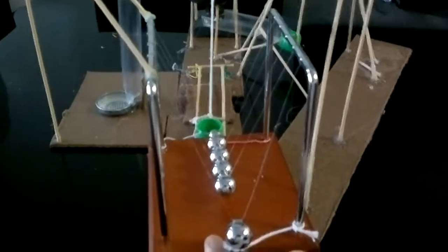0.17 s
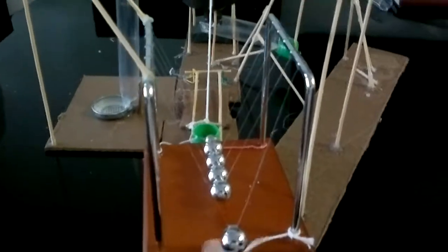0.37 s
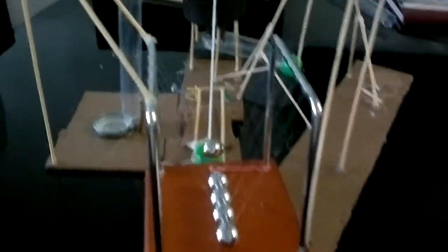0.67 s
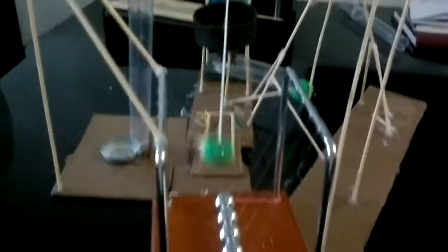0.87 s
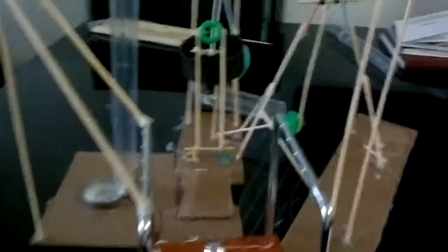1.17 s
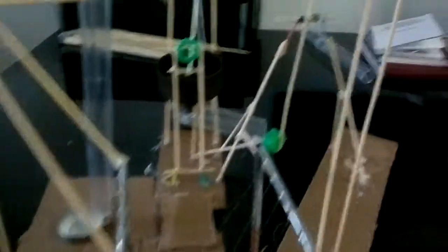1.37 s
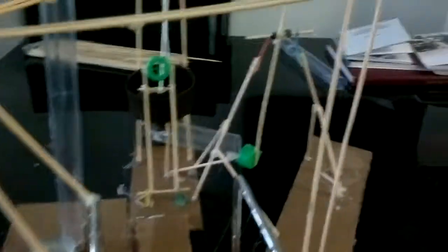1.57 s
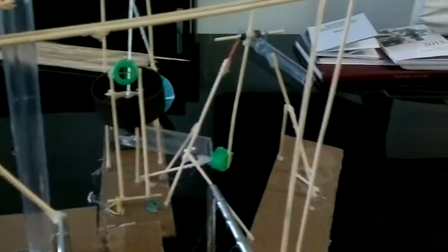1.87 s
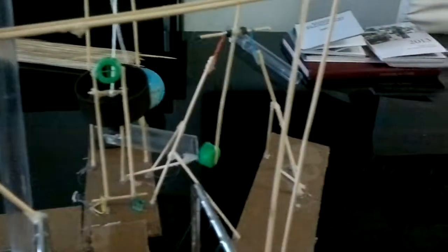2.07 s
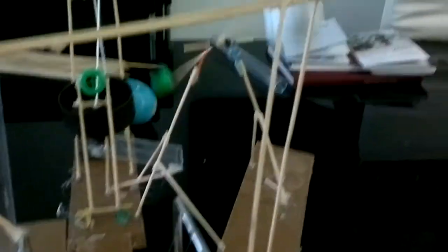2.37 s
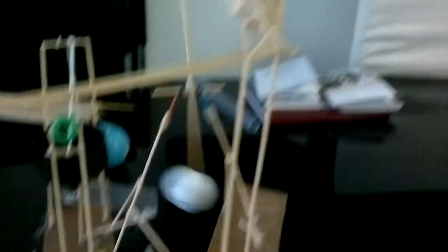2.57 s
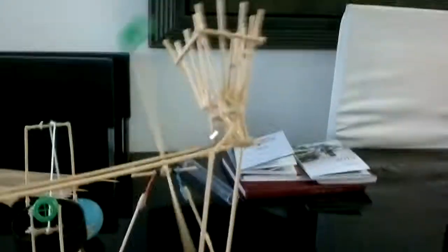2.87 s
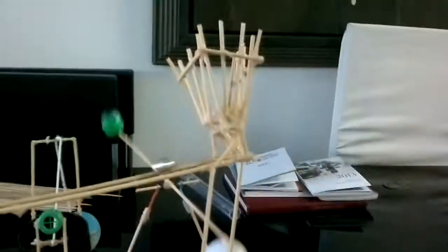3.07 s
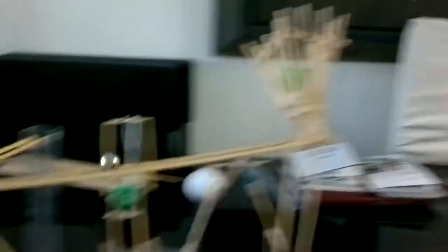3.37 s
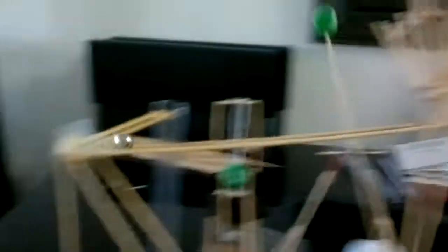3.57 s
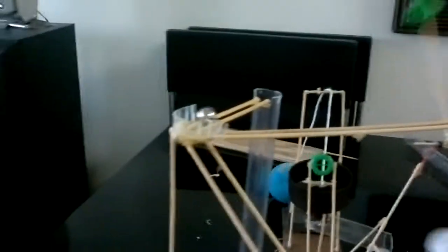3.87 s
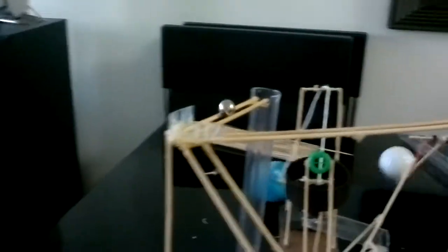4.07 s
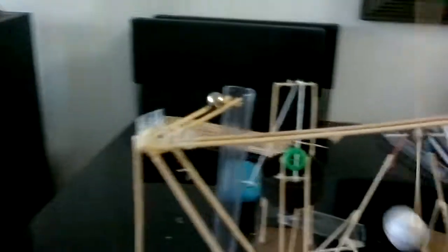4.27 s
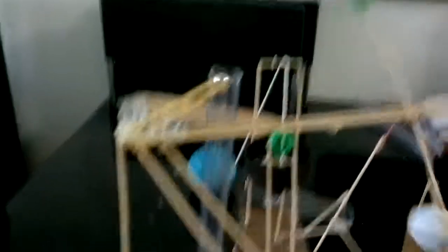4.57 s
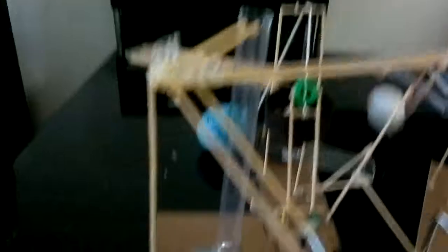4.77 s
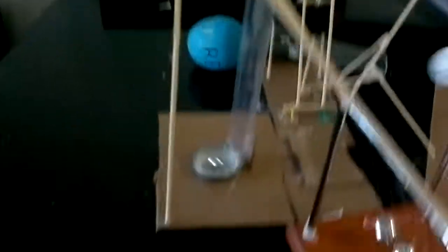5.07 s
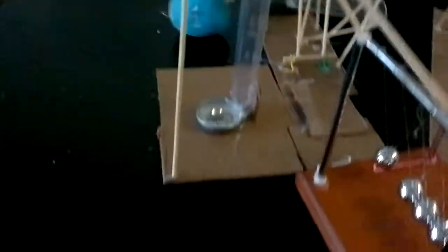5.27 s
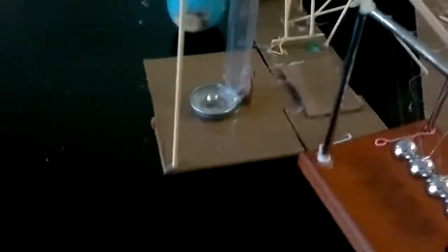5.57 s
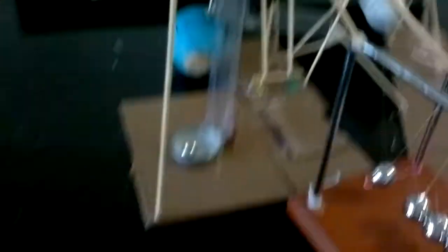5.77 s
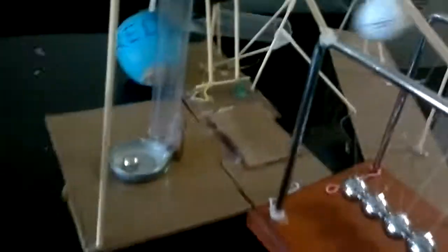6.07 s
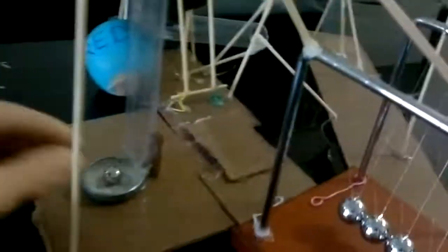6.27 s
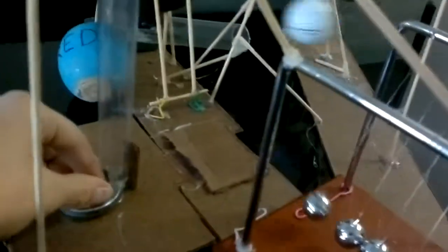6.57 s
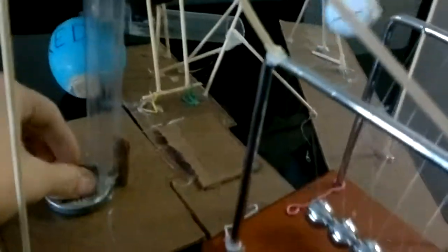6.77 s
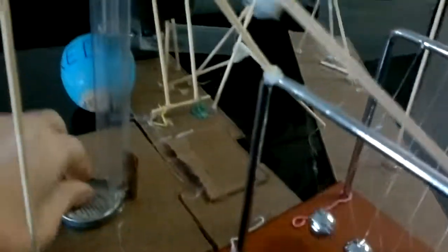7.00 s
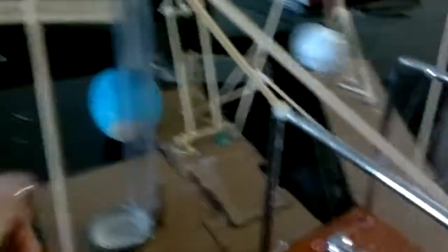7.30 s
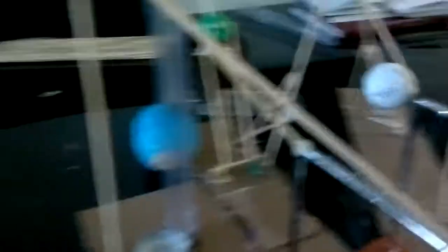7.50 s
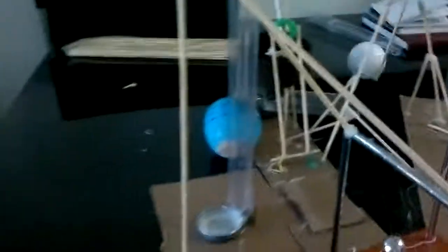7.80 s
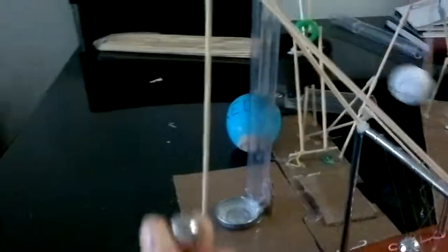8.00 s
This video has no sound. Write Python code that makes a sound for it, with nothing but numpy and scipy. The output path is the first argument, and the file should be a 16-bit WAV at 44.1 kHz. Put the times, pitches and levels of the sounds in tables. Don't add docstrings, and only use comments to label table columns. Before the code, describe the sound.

In a small, lively room, a hand-held phone close to a stick-and-cardboard machine catches regular hard steel clacks. Loud thumps and cracks come first, then a dry catch rattle, wooden knocks and a faint rolling ball. It rattles down a hollow pipe and clanks into a tin lid. Fingers bump the phone, scrape the ball out, and the clacking carries on quietly.

```python
import sys
import numpy as np
from scipy import signal
from scipy.fft import rfft, irfft, next_fast_len
from scipy.io import wavfile
from scipy.ndimage import uniform_filter1d

SR = 44100
rng = np.random.default_rng(int(sys.argv[2]) if len(sys.argv) > 2 else 0)


def undo_db(level):
    steps = np.asarray(level, float) / 20
    return 10 ** steps


def store_pcm(level_fs):
    pcm = np.round(np.clip(level_fs, -1, 1) * 32767).astype(np.int16)
    wavfile.write(sys.argv[1], SR, np.atleast_2d(pcm).T)


N = 358929

# [f/Hz, level/dB per Hz]
CRACK = [(410, -39.5), (700, -6.5), (1850, -1), (3870, 4.5), (4250, 0.5), (4720, 1.5), (5170, -2),
         (9860, -13), (16300, -31)]


def evened(x):
    return x / np.sqrt(np.mean(x ** 2) + 1e-20)


def peaked(x):
    return x / abs(x).max(1, keepdims=True)


def read(points, hz, axis=1):
    table = np.transpose(points)
    return np.interp(np.log(hz + 1), np.log(table[0] + 1), table[axis])


def level(rows, axis=1):
    table = np.transpose(rows)
    return undo_db(np.interp(np.arange(N) / SR, table[0], table[axis], -200, -200))


def sides(pan_db):
    gains = undo_db([[pan_db / 2], [-pan_db / 2]])
    return gains / np.sqrt(np.mean(gains ** 2))


def coloured(x, spectrum):
    db = read(spectrum, abs(np.fft.fftfreq(2048, 1 / SR)))
    log_gain = np.log(undo_db(np.maximum(db, -80)))
    taps = np.fft.ifft(np.exp(np.conj(signal.hilbert(log_gain)))).real[:1024]
    return signal.oaconvolve(x, taps[None], axes=1)[:, :x.shape[1]]


def resonate(x, modes):
    out = 0
    for hz, width, db in modes:
        pole = np.exp((2j * np.pi * hz - np.pi * width) / SR)
        once = signal.lfilter([1], [1, -pole], x)
        twice = signal.lfilter([1], [1, -pole], once).real
        out = out + undo_db(db) * evened(twice)
    return evened(out)


def rings(modes, t, count):
    chance = rng.uniform(-3, 3, (count, len(modes)))
    out = 0
    for k, (hz, db, t60) in enumerate(modes):
        decay = undo_db(db + chance[:, [k]] - 60 * t / t60)
        out = out + (-1) ** k * decay * np.sin(2 * np.pi * hz * t)
    return out


def bursts(count, spectrum, t60, size, rise_s=.0009):
    t = np.arange(size) / SR
    noise = rng.standard_normal((count, size)) * undo_db(-60 * t / t60) * (1 - np.exp(-t / rise_s))
    puffs = peaked(coloured(noise, spectrum))
    smooth = coloured(np.eye(1, size), spectrum)
    energy = np.linalg.norm(puffs, axis=1, keepdims=True)
    return np.array([puffs, smooth * energy / np.linalg.norm(smooth)])


def add(line, at, sound):
    line[at:at + len(sound)] += sound


def place(rows, near, far, pans_db, rooms_db):
    bus = np.zeros((5, N + near.shape[1] + 64))
    for k, row in enumerate(rows):
        at = round(row[0] * SR)
        late = int(np.clip(-.55 * pans_db[k] - 5, -35, 35))
        left, right = undo_db(row[1]) * sides(pans_db[k]) * near[k]
        add(bus[0], at + max(late, 0), left)
        add(bus[1], at + max(-late, 0), right)
        add(bus[2 + k % 3], at, undo_db(row[1] + rooms_db[k]) * far[k])
    return bus[:, :N]


def place_rub(direct, path, send):
    bus = np.zeros((5, N))
    bus[:2] = direct
    bus[0] = np.roll(bus[0], 12)
    bus[2 + path] = send
    return bus


def grit(per_s, spread_db):
    sizes = undo_db(spread_db * np.minimum(rng.exponential(1, N), 4))
    return sizes * (rng.random(N) < per_s / SR) * rng.choice([-1, 1], N)


def lumps(per_s, spread_db):
    drift = np.interp(np.arange(N) * per_s / SR, np.arange(400), rng.standard_normal(400))
    return undo_db(spread_db * evened(drift))


def pair(z, other, same):
    same = np.clip(same, -1, 1)[:, None]
    return np.array([z, same * z + np.sqrt(1 - same ** 2) * other])


def room(send):
    # [f/Hz, t60/s]
    room_t60 = [(100, 0.51), (300, 0.37), (1000, 0.43), (3000, 0.31), (6000, 0.31), (10000, 0.25),
                (15000, 0.19)]
    # [f/Hz, likeness]
    room_same = [(200, 0.93), (400, 0.82), (700, 0.71), (1300, -0.12), (2400, -0.084)]
    # [f/Hz, level/dB, left-right/dB]
    room_tone = [(101, 1, -1), (955, -5, 1.5), (3300, -7.5, -3), (6650, -4.5, -2.5), (15000, -7.5, -12)]
    taps = np.zeros((2, 22000))
    at = np.arange(130, 21980, 20) + rng.integers(0, 20, (2, 1093))
    np.put_along_axis(taps, at, rng.choice([-1., 1.], at.shape), 1)
    hz, t, z = signal.stft(taps, SR, nperseg=256)
    decay = undo_db(-60 * (t / read(room_t60, hz)[:, None]) ** 0.81)
    z = pair(*z, read(room_same, hz)) * decay * (1 - np.exp(-t / .007))
    tail = signal.istft(z, SR, nperseg=256)[1]
    tail[:, :130] = 0
    tail /= np.sqrt((tail ** 2).sum() / 2)
    size = next_fast_len(N + 22200)
    hz = np.fft.rfftfreq(size, 1 / SR)
    tone = undo_db(read(room_tone, hz) + np.array([[.5], [-.5]]) * read(room_tone, hz, axis=2))
    return irfft(rfft(send, size) * rfft(tail, size) * tone, size)[:, :N]


def struck(modes, hits, pan_db, wall_t60, wall_hz):
    _, _, crack_db, rooms_db = np.transpose(hits)[:, :, None]
    count = len(hits)
    t = np.arange(8192) / SR
    detuned = t * rng.uniform(0.99, 1.015, (count, 1))
    ring = peaked(rings(modes, detuned, count) * (1 - np.exp(-t / 0.00027)))
    hump = 2.3 * signal.lfilter(*signal.butter(2, wall_hz, fs=SR), ring * undo_db(-60 * t / wall_t60))
    crack = undo_db([[[0]], [[3.]]] + crack_db) * bursts(count, CRACK, 0.0076, size=len(t))
    near, far = np.array([ring, hump]) + crack
    top = abs(near).max(1, keepdims=True)
    return place(hits, near / top, far / top, np.full(count, pan_db), rooms_db[:, 0] + 5.0)


def air():
    # [f/Hz, level/dB per Hz]
    air_colour = [(12, -45.5), (20, -4.5), (65, -6.5), (204, -29), (241, -3), (328, -28), (377, -21.5),
                  (446, -31.5), (499, -18.5), (1910, -22), (2390, -25), (3340, -28.5), (16000, -38)]
    # [f/Hz, level/dB]
    hum = [(242.2, -77), (290.7, -64)]
    # [f/Hz, likeness]
    air_same = [(25, 0.79), (60, 1), (240, 0.82), (700, 0.33), (1300, 0.47), (2400, 0.058)]
    frames, hz = N // 512 + 5, np.fft.rfftfreq(2048, 1 / SR)
    a, b, c, d, patches = rng.standard_normal((frames, 1025, 5), dtype=np.float32).T
    patches = evened(uniform_filter1d(uniform_filter1d(patches, 20, 0), 8, 1))
    colour = undo_db(read(air_colour, hz)[:, None] + 1.8 * patches)
    z = pair(a + 1j * b, c + 1j * d, read(air_same, hz)) * colour
    noise = undo_db(-58.5) * evened(signal.istft(z, nperseg=2048, noverlap=1536)[1][:, :N])
    for line_hz, db in hum:
        noise = noise + undo_db(db) * resonate(rng.standard_normal(N), [(line_hz, 9, 0)])
    return noise


def handling():
    # [t/s, level/dB]
    fondle = [
        (6.95, -81),
        (7.4, -72),
        (8.14, -74),
    ]
    return level(fondle) * lumps(9., 4.6) * resonate(grit(1200., 2.5), [(3700, 1230, 0)])


def fingers():
    # [t/s, peak/dB, case ring f/Hz, t60/s, left-right/dB]
    bumps = [
        (5.784, -24, 163, 0.11, 10),
        (5.806, -12.5, 460, 0.0074, 14),
        (7.047, -40, 71, 0.19, -8),
    ]
    _, _, hz, t60, pans_db = np.transpose(bumps)[:, :, None]
    t = np.arange(8192) / SR
    sounds = peaked(-np.sin(2 * np.pi * hz * t) * undo_db(-60 * t / t60))
    return place(bumps, sounds, 0 * sounds, pans_db[:, 0], np.zeros(len(hz)))


def swaying():
    # [t/s, level/dB]
    sway_levels = [(0, -66.5), (.6, -56), (1.56, -59), (3.0, -54.5), (5.4, -57), (6.0, -53), (6.7, -59),
                   (8.14, -65.5)]
    modes = [(193, 57, -7.0), (295, 480, 13.0), (760, 88, 1.5)]  # (Hz, width Hz, dB)
    sway = level(sway_levels) * lumps(14., 2.5) * resonate(grit(730.0, 4.6), modes)
    sway = undo_db(-6.5) * sway
    return place_rub(sway, 2, undo_db(1.0) * sway)


def scraping():
    # [t/s, level/dB]
    scrape_levels = [
        (6.3, -66.5),
        (6.37, -57),
        (6.47, -55.5),
        (6.56, -56.5),
        (6.7, -66.5),
    ]
    # [f/Hz, width/Hz, level/dB]
    lid = [(1420, 420, -27), (2100, 1200, 17), (3000, 1000, -25), (4860, 1200, 8)]
    scrape = level(scrape_levels) * resonate(grit(1200.0, 3.4), lid)
    return place_rub(undo_db(7.5) * scrape * sides(-22.0), 1, undo_db(5.5) * scrape)


def rolling():
    # [t/s, lower rail/dB, upper rail/dB]
    rolls = [
        [(2.9, -67, -66), (3.12, -70, -69), (3.26, -64, -65), (3.33, -66, -62), (3.55, -64, -65),
         (3.68, -66, -72)],
    ]
    # [f/Hz, width/Hz, level/dB]
    rails = [(1600, 200, -4.5), (2400, 180, 1.5)]
    roll = 0
    for k, rail in enumerate(rails):
        loudness = sum(level(rows, axis=k + 1) for rows in rolls)
        wood = resonate(grit(1200., 2.5), [rail, (4000, 2500, -12.)])
        roll = roll + loudness * lumps(25., 4.5) * wood
    return place_rub(undo_db(7.5) * roll * sides(-16.0), 0, undo_db(-13.) * roll)


def lid_rim():
    # [f/Hz, level/dB, t60/s]
    rim_modes = [(1420, -2, 0.12), (1054, -8, 0.055), (2600, -5.5, 0.055), (2877, -10.5, 0.069),
                 (3300, -14, .07), (4540, -7, 0.0613)]
    # [t/s, peak/dB, crack/dB, room/dB]
    rim_hits = [
        (5.116, -15, -12, 1),
        (6.462, -24, -12.5, -15),
        (6.771, -31.5, -5, -7),
        (6.779, -27, -12, -26),
    ]
    return struck(rim_modes, rim_hits, -2, wall_t60=0.0081, wall_hz=4300)


def tin_floor():
    # [f/Hz, level/dB, t60/s]
    tin_modes = [(1866, 4, .02), (2046, 3.5, .02), (1884, -6.5, 0.22), (2100, -17, 0.25), (2690, 7, 0.011),
                 (3500, -30, .03), (4460, -9, 0.016), (7030, -14.5, 0.011)]
    # [t/s, peak/dB, crack/dB, room/dB]
    tin_hits = [
        (5.0166, -3.5, -3.5, 4.5),
        (5.032, -10, -17, 6.5),
        (5.0383, -17, -7, -4.5),
    ]
    return struck(tin_modes, tin_hits, -5.5, wall_t60=0.011, wall_hz=5500)


def pipe():
    # [f/Hz, level/dB, t60/s]
    pipe_modes = [(1100, -12.5, 0.023), (2030, -1, 0.0094), (2323, 4, 0.023), (1960, 0, 0.013),
                  (2100, -22.5, .4), (2600, -8.5, .015), (4730, -16.5, .012), (7260, 5.5, 0.0048)]
    # [t/s, peak/dB, crack/dB, room/dB]
    pipe_hits = [
        (4.7408, -2, -12.5, 2.1),
        (4.751, -10, -16.5, 0.5),
        (4.7618, -4.5, -5, -6.5),
        (4.78, -0.5, -3.5, -15.5),
    ]
    return struck(pipe_modes, pipe_hits, -2.5, wall_t60=.01, wall_hz=3500)


def catch():
    # [f/Hz, level/dB, t60/s]
    catch_modes = [(1500, -8, 0.008), (3960, -2.5, 0.0088), (4200, -2.5, 0.014), (5600, -4.5, 0.0065),
                   (7000, -7, 0.0034), (8500, -3, 0.006), (10900, -9, 0.0026)]
    # [t/s, peak/dB, crack/dB, room/dB]
    catch_hits = [
        (2.029, -6, -4, -5),
        (2.0361, -10.5, -7, -4.5),
        (2.0432, -14, -4.5, -7),
        (2.047, -20, -2, -4.5),
        (2.052, -30, -1, -4),
        (2.248, -12, 1, -2),
        (2.2521, -18, -1, -2),
        (2.26, -21.5, 1, -1.5),
    ]
    return struck(catch_modes, catch_hits, -1.9, wall_t60=0.0071, wall_hz=6800)


def thumps():
    # [t/s, peak/dB, ring f/Hz, table ring/dB, room/dB]
    blows = [(0.599, -42.5, 101, -12.5, -0.5), (0.788, -48, 193, -26, 8.5),
             (1.015, -8.5, 158.4, -14.5, -5.5), (1.177, -3.5, 1200, -23.5, -15),
             (1.244, -3, 623, -15, -1.5), (1.281, -5.5, 494, -12, -3), (1.606, -25.5, 300, -20, -12),
             (1.815, -36.5, 333, -7, -20), (2.669, -11, 600, -24.5, -5), (2.883, -28.5, 200, -3, -13.5),
             (3.354, -38.5, 189, -32, 0), (3.646, -40, 205, -28, 0), (3.676, -29.5, 152, 0.5, -11),
             (3.777, -37, 214, -23, -0.5), (3.801, -33.5, 200, -6, -4.5), (4.046, -34, 265, -32, -15.5),
             (4.406, -34, 475, -2.5, -1), (4.576, -41.5, 446, -24.5, 5), (4.742, -16.5, 1180, -7, -1.5),
             (4.757, -9.5, 340, -8, -9), (5.03, -30.5, 220, -4, -1.5), (5.536, -41, 324, -14, -2.5),
             (5.92, -54, 316, 17, 0), (6.429, -38, 370, 1, -8), (6.702, -52.5, 250, 5, 6)]
    # [f/Hz, level/dB per Hz]
    board = [(40, -33), (82, -6.5), (122, -19), (163, -2), (421, -4.5), (676, -2), (1000, -3.5), (1400, -2),
             (1750, -20.5), (2500, -12.5), (4000, -34.5), (8000, -77.5)]
    # [f/Hz, level/dB, t60/s]
    table_modes = [(81, -0.5, 0.079), (174, -10, 0.035), (252, -0.5, 0.067)]
    # [f/Hz, level/dB, t60/s]
    cup_modes = [(83.7, -6.5, 0.25), (162, 1, 0.2), (276.5, -3, 0.31), (504, -5, 0.18), (600, 1.5, 0.13),
                 (672, -1.5, .25), (756, -7.5, 0.24), (877, -2, 0.3), (1127, 6, 0.12), (1223, 4, 0.19),
                 (1357, -6.5, 0.25)]
    s, _, hz, table_db, wet_db = np.transpose(blows)[:, :, None]
    count = len(s)
    t = np.arange(11000) / SR
    ring = 0.62 * np.sin(2 * np.pi * hz * t) * undo_db(-60 * t * hz / 21.0)
    cup_struck = (s > 1.0) * (s < 1.5)
    under = rings(table_modes, t, count) + rings(cup_modes, t, count) * cup_struck
    near, far = ring + bursts(count, board, 0.049, size=len(t))
    near = peaked(near) + undo_db(table_db) * under * (1 - np.exp(-t / 0.0019))
    return place(blows, near, 0.97 * far, np.full(count, 1.5), wet_db[:, 0] + 5.0)


def knocks():
    # [t/s, peak/dB, ring f/Hz, crack over the ring/dB, room/dB]
    launch = [(.39, -44, 4020, 26.5, -1), (.417, -38, 2350, -12, 2), (.57, -34.5, 5000, 6, -3),
              (.5875, -18.5, 5600, 1, -5.5), (.6405, -24, 5600, 5.5, -4.5),
              (.6731, -26.5, 9110, -3.5, -4.5), (.7312, -39, 9140, -1, -4.5), (.7918, -7, 2210, -10, -7.5),
              (.807, -10, 2400, -11.5, -2), (.8138, -20, 4170, -2.5, 8), (.9903, -24, 4770, -1.5, -5),
              (1.0145, 4, 2600, 13.5, -1.5), (1.029, -10.5, 1000, -2, 3), (1.1274, -7, 2440, 6, -4),
              (1.138, -13, 2600, 0, -10.5), (1.1773, 0.5, 4510, 9, 0), (1.183, -7, 3300, 2, -5),
              (1.2356, -21, 4030, -3, 10.5), (1.283, -22, 2560, 2, 0), (1.379, -35, 3500, -7.5, -9),
              (1.4136, -34, 5200, 6, -10)]
    levers = [(1.6135, -14, 1575, -2.5, 6.5), (1.6194, -8.5, 2400, 8.5, -8.5), (1.6345, -19, 3300, -29, 8),
              (1.637, -13.5, 1636, -13.5, -10), (1.641, -20, 4880, 9.5, -15), (1.6855, -35, 4460, 5, -9),
              (1.769, -35, 1600, 2, 6), (1.8455, -28, 2480, 1, 5)]
    latch = [(2.0091, -26, 3770, 34, -1), (2.024, -25, 3370, -3, -9), (2.228, -32, 1456, -5, 6),
             (2.235, -34.5, 1504, -1, -12), (2.348, -37.5, 1950, -4, 2), (1.943, -41, 4930, 11.5, 0)]
    basket = [(2.6566, -21, 3750, 0, 2), (2.6695, -19.5, 1500, -11.5, -1.5), (2.684, -17, 3500, -5, -2),
              (2.668, -7, 3840, -6, -6.5), (2.671, -3.5, 2330, 1.5, -1), (2.676, -8.5, 3690, -17, 5),
              (2.751, -24, 1980, 5, -0.5), (2.81, -23.5, 2340, 3, -1.5), (2.852, -26.5, 544, -8, -6),
              (2.8534, -19, 2400, 0.5, 0), (2.8863, -25, 2470, 11, -13), (3.0064, -39, 2410, 0, -7),
              (3.3468, -19.5, 1615, 4.5, 3), (3.36, -23, 2270, -20, -0.5), (3.3673, -22, 3800, -13.5, 0),
              (3.434, -22, 1600, 5.5, 1), (3.6677, -30.5, 1420, -3, 3.5), (3.706, -35, 1480, -6, -0.5),
              (3.772, -30, 1470, 5, 2), (3.809, -26.5, 1494, 6.5, -5), (3.9913, -39.5, 3900, 5, -7),
              (4.0133, -38, 4950, -1, -14), (4.0382, -28.5, 4480, -3, 11), (4.057, -24.5, 2210, 1.5, -1),
              (4.123, -24.5, 3910, 5.5, -5.5), (4.2612, -38.5, 5050, -10, -4.5),
              (4.5059, -38.5, 2310, 11.5, 1.5), (4.5796, -32, 1693, -2.5, 6)]
    tube = [
        (4.7465, -14, 5050, 0, 0),
        (4.7625, -3, 4500, -3, -2),
        (4.962, -48.5, 6000, 19, -4),
    ]
    drop_knocks = [(5.0385, -7.5, 4420, -2, -1.5), (5.048, -18, 4600, 1.5, -3.5),
                   (5.066, -16.5, 4540, -10.5, -1), (5.1125, -5.5, 4200, 1, -4.5),
                   (5.115, -17.5, 1345, -22, -7.5), (5.1283, -23.5, 4560, -6, -9),
                   (5.172, -24, 1960, 0, -10), (5.4566, -44.5, 1030, 5, 4), (5.497, -39.5, 6350, -1.5, -1),
                   (5.5363, -43.5, 855, 16, 4.5)]
    grip = [(5.769, -44, 2500, 0, -6), (5.7848, -34, 2540, -15, 8), (5.786, -22.5, 740, -20, -7.5),
            (5.797, -40, 2400, 1, 3), (5.801, -30, 3200, 10, -5), (5.8055, -15.5, 1500, -25, -20),
            (5.806, -19, 3300, -26, -10), (5.821, -39, 1750, -15, -10), (5.83, -36, 5170, -6, 0),
            (5.843, -38, 2450, -15, 1), (5.882, -41.5, 3700, -18, 12.5), (7.065, -43.5, 4980, -6, 0)]
    pick = [(6.2747, -42, 2400, -1, -12), (6.3634, -40.5, 1450, -1.5, 14.5), (6.3848, -34, 1890, -3, 3),
            (6.4289, -14, 2600, 4.5, -3.5), (6.4325, -17, 1850, -35, -2), (6.4593, -23, 3700, 3, -1.5),
            (6.464, -41, 2100, -31.5, 3), (6.56, -40, 5270, 26, -5), (6.7672, -21.5, 1200, 7, -9),
            (6.7727, -30, 1340, -1, 4), (6.727, -48, 1100, -4, 2), (6.78, -33.5, 2860, -36, 12),
            (6.785, -35, 4100, -10, 9), (7.545, -48.5, 3980, 8, -6)]
    # (knocks, left-right dB, room dB, cycles of the main hump, cycles of the near ring)
    stages = [(launch, 5.7, -8, 3.5, 28), (levers, -1.5, -8.5, 3.04, 22), (latch, -2.5, -9.5, 6, 25),
              (basket, -4, -8, 4.8, 50), (tube, -9, -10, 3.5, 72), (drop_knocks, -1.2, -11, 3.3, 40),
              (grip, 58, -14.5, 2.4, 6.8), (pick, -7, -7.5, 3.1, 33)]
    rows = np.array([(*row, *stage) for hits, *stage in stages for row in hits])
    _, _, hz, crack_db, wet_db, pans_db, rooms_db, cycles, ring_cycles = rows.T[:, :, None]
    t = np.arange(1536) / SR
    spread = rng.uniform(.93, 1.3, (len(hz), 4)) ** np.array([0, 1, 1, 1])
    ratios = np.array([1, 1.4, 0.83, 3.2]) * spread
    ring = 0
    for k, db in enumerate([8.5, 0, -2, -12]):
        ring = ring + undo_db(db) * np.sin(2 * np.pi * hz * ratios[:, [k]] * t)
    ring = peaked(ring * undo_db(-60 * t * hz / ring_cycles) * (1 - np.exp(-t / 0.00074)))
    hump = 1.14 * peaked(t * np.sin(2 * np.pi * hz * t) * undo_db(-60 * t * hz / cycles))
    near, far = np.array([ring, hump]) + undo_db(crack_db) * bursts(len(hz), CRACK, 0.0083, size=len(t))
    top = abs(near).max(1, keepdims=True)
    return place(rows, near / top, far / top, pans_db[:, 0], (rooms_db + wet_db)[:, 0] + 14.0)


def cradle():
    # [t/s, peak/dB, room/dB]
    swings = [(0.5582, -15, 3.5), (0.8656, -11.5, -3.5), (0.868, -12, -3.5), (1.5043, -20.5, 9),
              (1.5104, -19, 0), (1.515, -22, -3), (1.824, -26, 5), (1.8308, -17, -7), (1.8345, -15.5, 1.5),
              (2.1464, -16, 1.5), (2.1504, -32.5, 1), (2.1514, -11.5, -3.5), (2.4673, -26, 2.5),
              (2.4712, -15.5, 0.5), (2.7894, -15.5, -1), (2.7901, -26.5, -4), (2.792, -11.5, -8.5),
              (3.1082, -26.5, 7), (3.1105, -16, 0), (3.4276, -17, 1), (3.4309, -13.5, -6),
              (3.746, -23.5, -7.5), (3.7483, -18.5, 4), (3.7508, -24.5, -3), (4.0662, -12.5, -5.5),
              (4.0686, -14, -11.5), (4.0728, -11.5, -12.5), (4.3815, -25.5, 1.5), (4.3861, -23, 4),
              (4.3889, -17.5, 1), (4.7007, -30, 11.5), (4.7055, -19, 1), (4.7078, -18.5, 2.5),
              (5.3386, -20, 4.5), (5.3429, -20, -6.5), (5.3462, -23, -10), (5.6566, -19.5, -0.5),
              (5.6583, -20, -1), (5.6607, -23, 2.5), (5.9763, -19.5, -0.5), (5.9789, -23, -2),
              (6.2935, -23.5, -1), (6.2959, -23, 4), (6.2963, -17, -10), (6.6089, -24, -6.5),
              (6.6109, -17.5, 0.5), (6.613, -19.5, -15), (6.9226, -19, 0), (6.9298, -20, -6),
              (7.2418, -26, -15), (7.2448, -19, -2.5), (7.246, -33, -10), (7.5591, -42, -13.5),
              (7.5616, -22.5, -1), (7.5633, -23, -4.5), (7.8746, -21.5, -4), (7.8779, -26.5, -3),
              (7.8794, -25.5, 0)]
    # [f/Hz, level/dB per Hz]
    steel = [(710, -48.5), (1200, -25), (1900, -25), (3270, -11), (4070, -5), (4790, -5), (7330, -8.5),
             (8930, -9), (11100, -12.5), (15600, -25.5), (16300, -44)]
    # [t/s, left-right/dB]
    row_side = [(.5, 5.5), (.9, 15), (1.5, -6.5), (3, -7), (4.5, -5.5), (5.6, -13), (6.8, -18.5), (7.6, -5)]
    s, _, rooms_db = np.transpose(swings)
    pans_db = np.interp(s, *np.transpose(row_side))
    near, far = bursts(len(s), steel, 0.004, size=1024, rise_s=0.0012)
    return place(swings, near, far, pans_db, rooms_db)


def scene():
    bus = fingers() + swaying() + scraping() + rolling()
    bus = bus + lid_rim() + tin_floor() + pipe() + catch()
    bus = bus + thumps() + knocks() + cradle()
    machine = bus[:2] + sum(room(send) for send in bus[2:])
    low_cut = signal.butter(2, 65., "high", fs=SR, output="sos")
    return signal.sosfilt(low_cut, machine) + air() + handling()


def hushed(x):
    threshold_db, knee_db, depth_db, lowest_hz = -69.5, 14.5, -8, 2140
    hz, _, z = signal.stft(x, SR, nperseg=512)
    power = uniform_filter1d((abs(z) ** 2).mean(0), size=15, axis=0)
    power = uniform_filter1d(power, size=4, axis=1)
    shut = .5 - .5 * np.tanh((10 * np.log10(abs(power) + 1e-20) - threshold_db) / knee_db)
    treble = 1 / (1 + (lowest_hz / (hz[:, None] + 1)) ** 4)
    return signal.istft(z * undo_db(depth_db * shut * treble), SR, nperseg=512)[1][:, :N]


def roll_off(x):
    return signal.sosfilt(signal.butter(12, 16410, fs=SR, output="sos"), x)


def record(dry):
    keep = np.exp(-1 / (0.015 * SR))
    power_db = 10 * np.log10(signal.lfilter([1 - keep], [1, -keep], (dry ** 2).mean(0)) + 1e-12)
    fall = np.arange(N) * 140.0 / SR
    held_db = np.maximum.accumulate(power_db + fall) - fall
    over_db = np.maximum(held_db + 19.5, 0)
    clipped = np.clip(hushed(dry) / undo_db(0.41 * over_db), -1.05, 1.05)
    held = signal.sosfilt(signal.butter(8, 16000., fs=SR, output="sos"), clipped)
    return roll_off(np.clip(held, -1, 1))


dry = scene()
out = record(dry)
store_pcm(out)
```